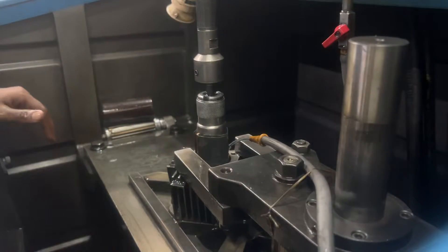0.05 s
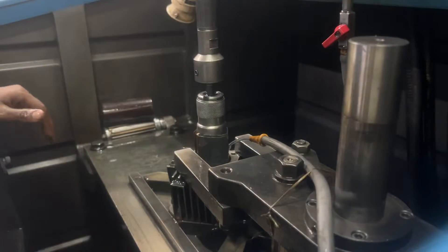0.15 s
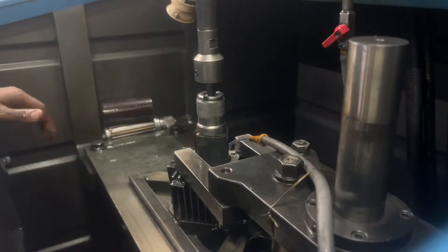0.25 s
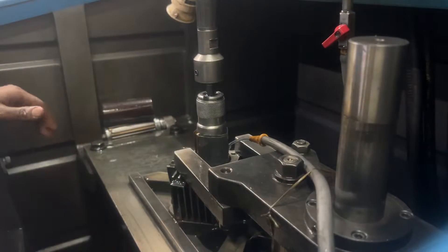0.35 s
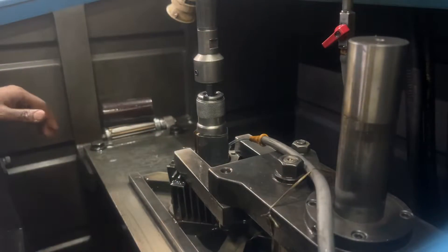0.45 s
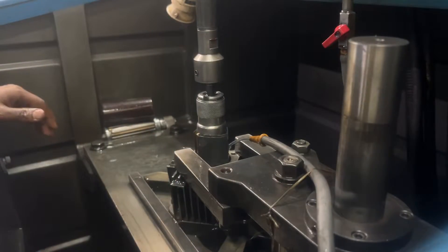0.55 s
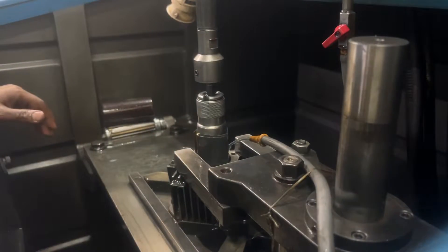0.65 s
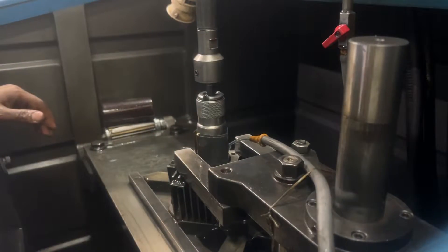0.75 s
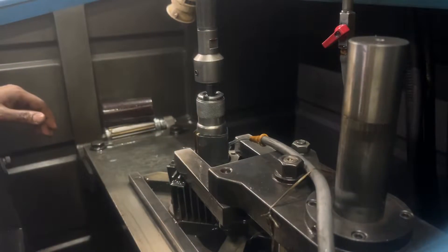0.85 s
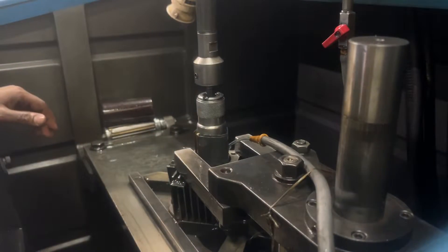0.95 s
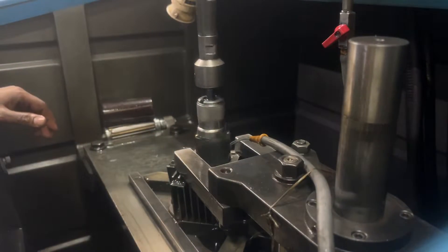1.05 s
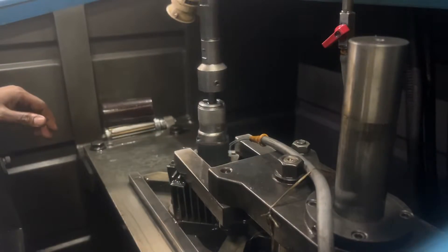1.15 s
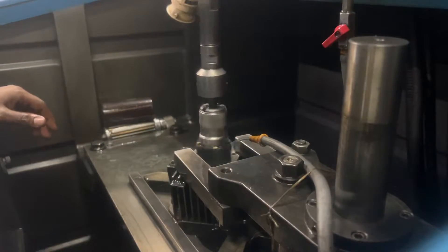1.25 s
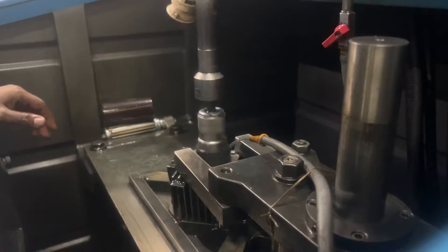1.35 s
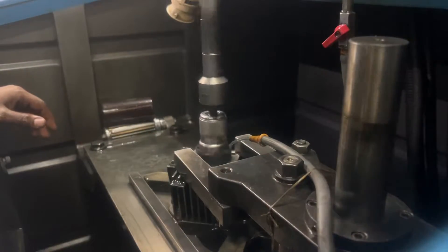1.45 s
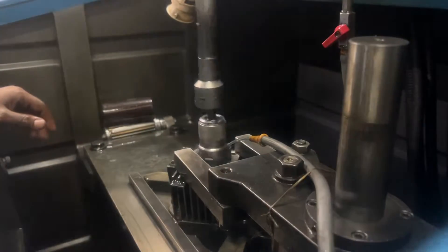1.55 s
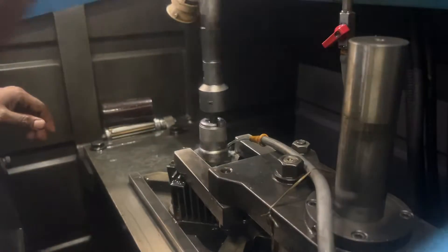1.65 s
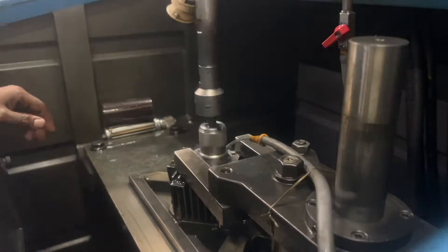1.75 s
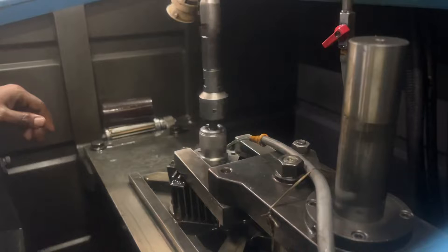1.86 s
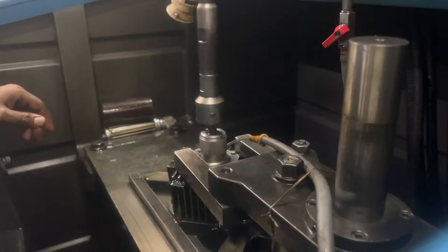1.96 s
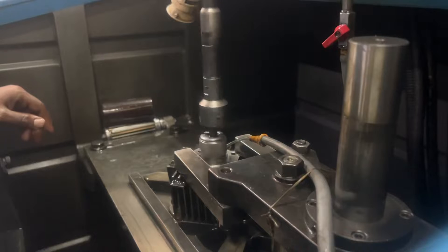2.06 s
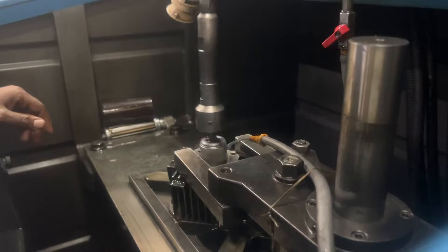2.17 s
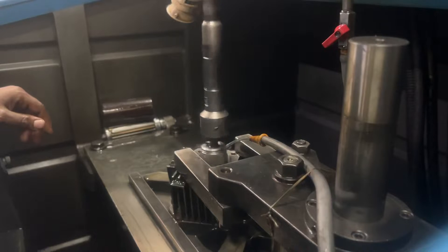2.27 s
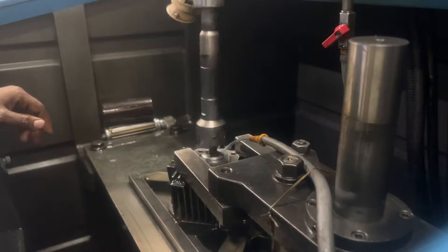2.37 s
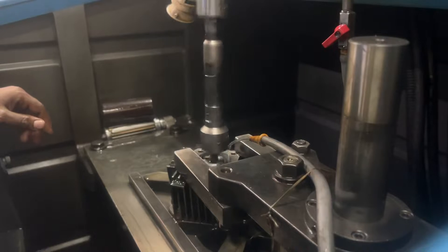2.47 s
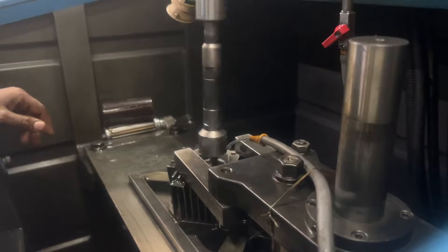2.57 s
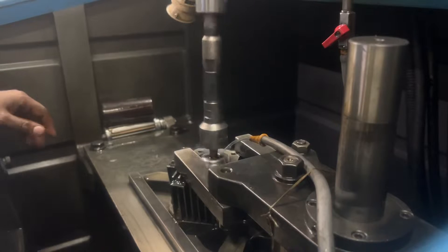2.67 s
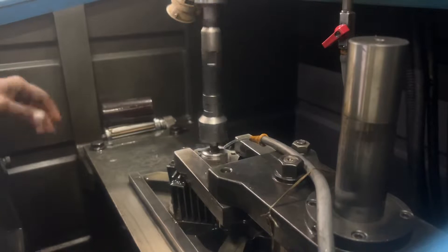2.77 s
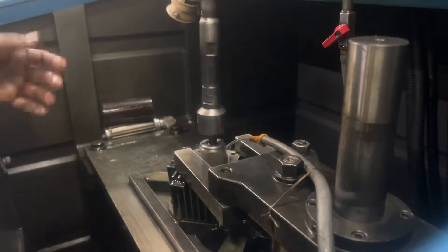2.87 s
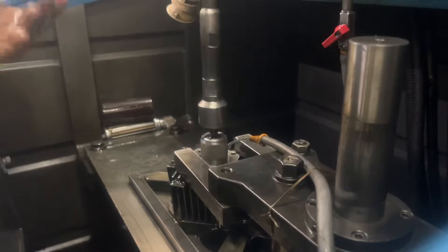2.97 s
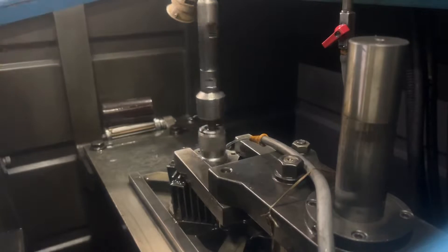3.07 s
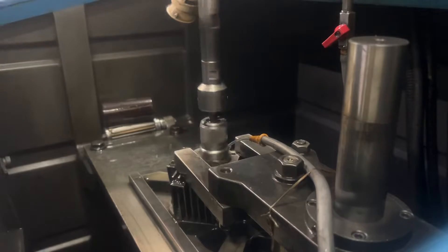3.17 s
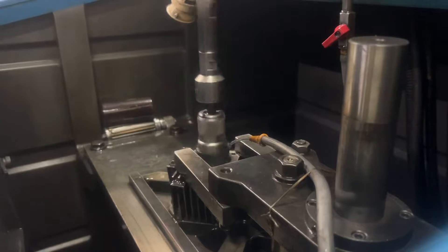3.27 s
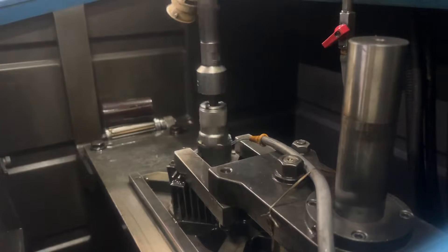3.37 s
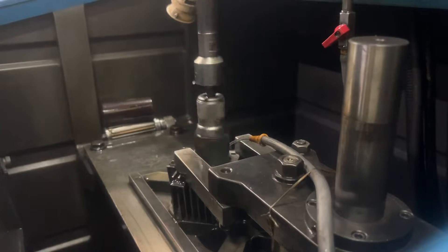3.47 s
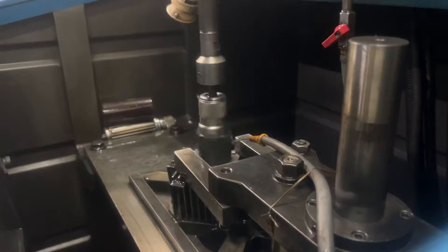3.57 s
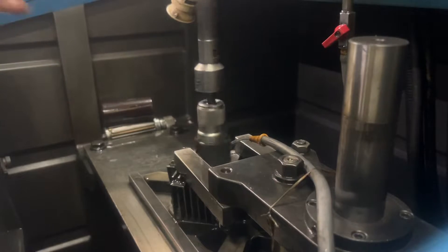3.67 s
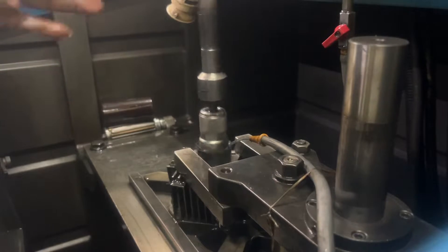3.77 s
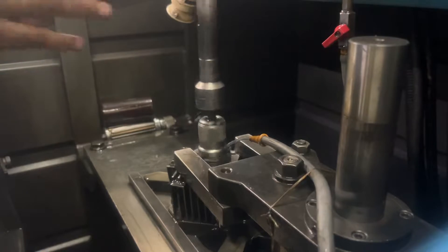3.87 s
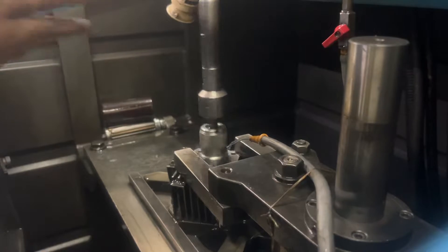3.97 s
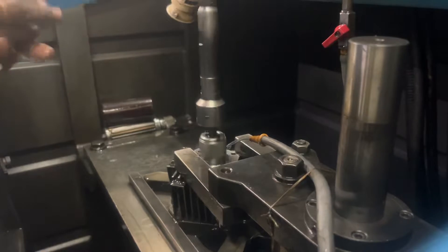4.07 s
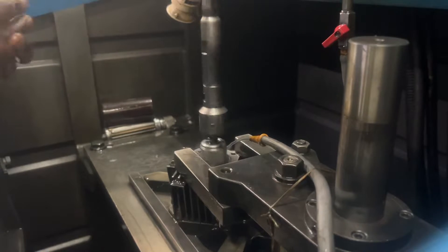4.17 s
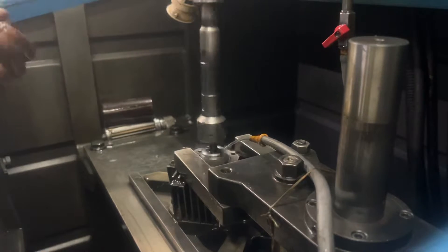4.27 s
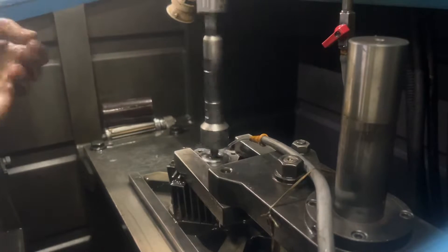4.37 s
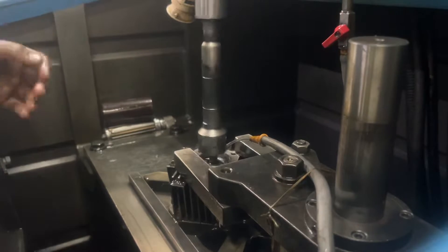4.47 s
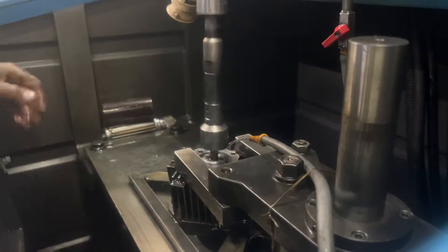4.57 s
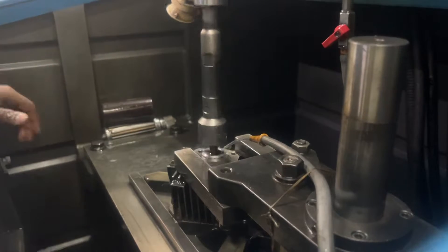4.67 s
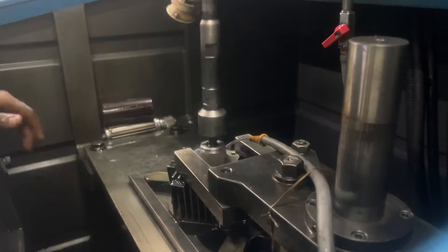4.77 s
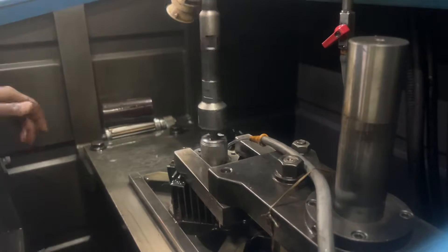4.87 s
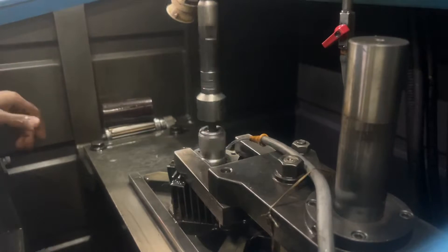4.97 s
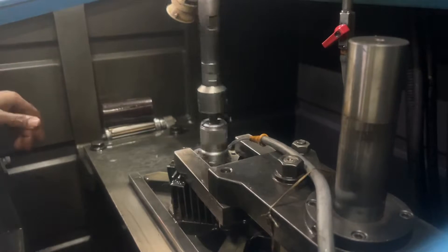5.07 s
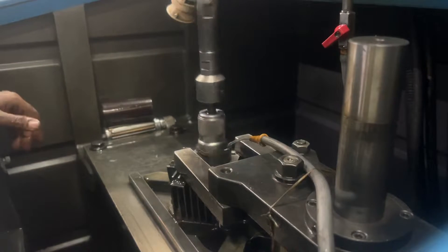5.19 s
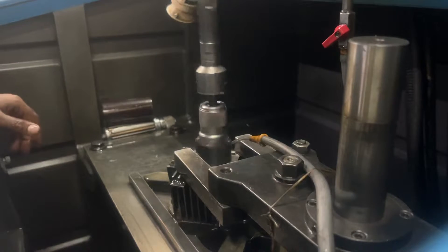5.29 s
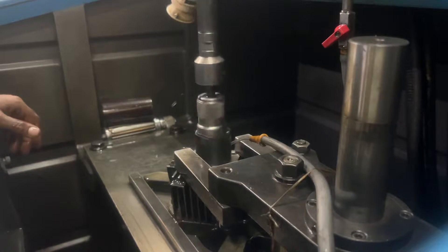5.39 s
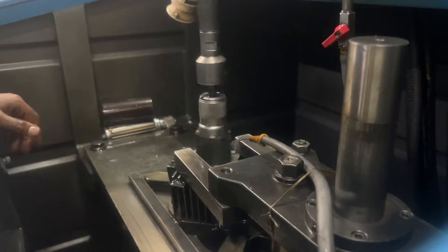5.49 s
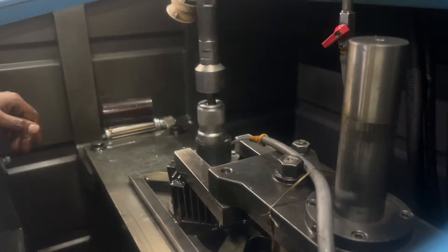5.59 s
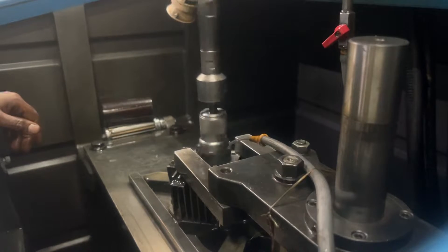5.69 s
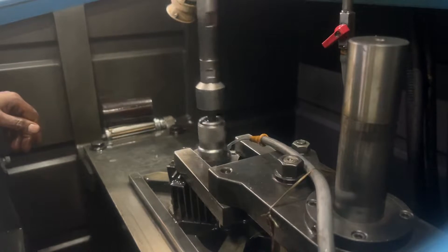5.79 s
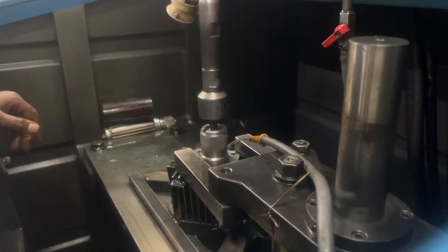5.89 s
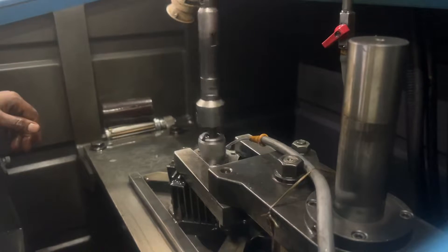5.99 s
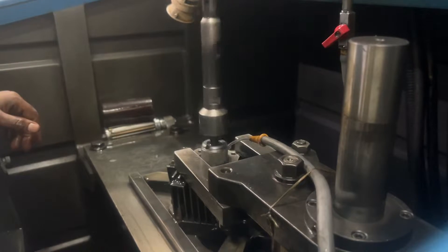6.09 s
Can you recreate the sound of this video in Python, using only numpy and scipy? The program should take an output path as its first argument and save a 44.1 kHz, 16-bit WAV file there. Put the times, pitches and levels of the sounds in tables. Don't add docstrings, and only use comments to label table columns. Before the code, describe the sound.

Close inside a steel test-bench cabinet, a hydraulic pump holds a strong hum near 290 hertz with faint motor whine. Just before one second a valve clacks and the ram starts, adding oil hiss, rumble and thin seal squeaks. At about 2.5, 3.5, 4.5 and 5.4 seconds, stroke ends bring metallic clatter, a spit of oil at some, and low wall booms. Close stereo phone pickup, short dense metal echo.

```python
import sys
import numpy as np
from scipy import signal
from scipy.fft import rfft, irfft
from scipy.io import wavfile
from scipy.ndimage import uniform_filter1d

SR = 44100
rng = np.random.default_rng(int(sys.argv[2]) if len(sys.argv) > 2 else 0)


def invert_db(x):
    u = np.asarray(x, float) / 20
    return 10 ** u


def materialize(psi):
    bounded = np.clip(np.atleast_2d(psi).T, -1, 1)
    quanta = np.round(bounded * 32767).astype(np.int16)
    wavfile.write(sys.argv[1], SR, quanta)


N = 270774
T = np.arange(N) / SR
HZ = np.arange(N // 2 + 1) * SR / N + 1e-3

# (time [s], level [dB])
PUMP_HUM = [(0, -21.5), (.2, -19), (.9, -19.4), (1.22, -18.6), (1.9, -19.7), (2.45, -19.8), (2.72, -18.9),
            (3.0, -19.9), (3.4, -20), (3.7, -21), (4.8, -19.5), (5.35, -20.5), (5.61, -19), (5.85, -20.5),
            (6.14, -20.5)]
# (multiple of the hum, idle [dB], loaded [dB], left minus right [dB], left lead [rad])
OVERTONES = [(2, -42, -51, 5.5, 1.13), (3, -45, -44.5, -0.5, 1.85), (5, -61, -57, 2, -1.5),
             (7, -63, -57.5, -8, 2), (8, -52, -56, 3, 2), (9, -55, -59.5, 5, 1.64),
             (12, -66, -65, -13, -0.2), (13, -58.5, -67, 6, -5.1), (14, -60, -60, 0, 1.2)]
WHINE_HZ = (246.5, 301.5, 315, 537.4, 690, 3227, 6690, 7219, 8226, 8440, 8694, 8992, 9285)
# (idle [dB], loaded [dB], left minus right [dB], left lead [rad])
WHINES = [(-36.5, -37.5, 5, -0.28), (-53, -41, -5, -1), (-38.5, -40.5, -1, -0.9), (-44.5, -51, -1, 0.2),
          (-72, -49, 3, 2), (-56.5, -56, 3.5, 1.36), (-68, -84, 9, .3), (-69, -74, 5, 4.5),
          (-74, -62.5, 0.3, 1), (-75, -62, -1, 0.8), (-72, -83, -5, -.3), (-57.5, -62.5, 1, -1.5),
          (-67, -66, 6, -1)]
# (time [s], depth [share of the hum], bounce [Hz])
JOLTS = [
    (.9, .3, 28),
    (2.541, 1.2, 26.5),
    (2.667, .8, 27),
    (3.53, .4, 28),
    (4.481, 1.1, 31),
    (4.585, .5, 30),
    (5.47, .3, 28),
]

SHIFTS = [
    (0.87, -31.5, -2.5),
    (.945, -43, 5),
    (2.522, -36, 4),
    (3.504, -33, -1),
    (4.454, -33.5, 5),
    (5.424, -34, -3),
]
SEATS = [
    (2.607, -30.5, 0),
    (4.553, -32.5, 0),
    (4.67, -37, 0),
    (5.52, -41.5, 0.00092),
]
SPURTS = [
    (2.619, -38.5, 0),
    (4.556, -36.5, 0),
    (5.775, -47, 0),
]
TICKS = [(.002, -45.5, 8), (.845, -47, 6), (1.69, -45, 4), (1.966, -47, 10), (2.503, -44, 13),
         (3.485, -48, 8), (4.045, -44, 0), (4.435, -46, 5), (5.405, -45, 5), (5.95, -46, 8), (5.99, -51, 6)]
# (frequency [Hz], width [Hz], level [dB])
CLANK = [(314, 87, 6), (575, 90, -6), (980, 400, -4), (1444, 250, -5), (1705, 200, -4), (2030, 250, -2),
         (1600, 1500, -4)]
CLINK = [(2280, 58, 5.5), (2820, 92, -7), (3386, 190, -1), (4000, 400, -26), (2780, 1860, -5.5),
         (11000, 1600, -6.5), (13000, 2500, -11)]
CHATTER = [(4400, 980, 2.5), (5470, 500, 2), (6070, 740, 5.5), (5400, 4700, 1)]
SPIT = [(7700, 1000, -1), (8810, 790, 3.5), (10800, 1500, -17)]
# (time [s], frequency [Hz], level [dB])
BRIEF_PINGS = [(.885, 2900, -44), (.89, 1800, -42), (.901, 2250, -41), (.93, 1800, -44), (.977, 2250, -44),
               (2.538, 3056, -44), (2.539, 2693, -44), (2.54, 992, -36), (2.54, 1953, -39),
               (2.613, 1000, -35), (2.627, 1055, -37), (2.628, 2016, -43), (2.631, 1496, -40),
               (2.654, 1591, -42), (2.655, 583, -32), (2.677, 1008, -38), (3.521, 835, -36),
               (3.537, 2599, -44), (3.541, 1591, -43), (3.543, 1213, -42), (3.574, 1606, -45),
               (4.472, 788, -34), (4.477, 1496, -36), (4.476, 450, -24), (5.435, 520, -31),
               (4.481, 1969, -33), (4.483, 2583, -43), (4.485, 3260, -43), (4.524, 1402, -40),
               (4.569, 1480, -38), (4.586, 945, -35), (4.629, 1591, -43), (4.684, 1606, -45),
               (4.737, 1559, -47), (5.421, 1449, -44), (5.45, 2788, -47), (5.498, 1528, -44),
               (5.552, 600, -31), (5.585, 500, -30)]
LONG_PINGS = [(.888, 3500, -41), (.918, 1820, -43), (.92, 2300, -43), (.96, 3200, -43), (2.547, 1717, -38),
              (2.546, 1292, -41), (2.551, 2315, -40), (2.545, 3276, -43), (2.55, 583, -29),
              (3.52, 3481, -42), (3.524, 1937, -39), (4.477, 3024, -44), (5.445, 2063, -41),
              (5.445, 3300, -45), (5.465, 2200, -41), (5.465, 3250, -46), (5.455, 1528, -45)]

# (start [s], end [s], start pitch [Hz], end pitch [Hz], level [dB])
THIN_SQUEAKS = [(-.1, .25, 2550, 2550, -48.5), (.22, .83, 2555, 2580, -54), (0.233, .6, 2250, 2275, -46.5),
                (1.0, 1.2, 2620, 2620, -52), (1.023, 1.326, 8000, 8030, -48.5),
                (1.27, 1.41, 2830, 2820, -52), (1.42, 1.6, 3220, 3245, -47), (1.5, 1.748, 2110, 2150, -49),
                (2.1, 2.52, 2620, 2620, -53), (2.25, 2.4, 2400, 2420, -47), (2.62, 3.0, 2570, 2600, -52),
                (2.85, 3.1, 2040, 2040, -53), (3.1, 3.5, 2560, 2590, -52), (3.6, 4.0, 2070, 2080, -50.5),
                (3.98, 4.26, 1987, 2110, -47), (4.294, 4.46, 2100, 2150, -47.5)]
ROUGH_SQUEAKS = [
    (.22, .58, 3430, 3380, -49),
    (2.64, 3.06, 3400, 3430, -52),
    (3.04, 3.49, 3500, 3645, -51.5),
    (3.1, 3.25, 3310, 3300, -52),
    (5.684, 5.899, 3380, 3450, -47),
]
SCRAPES = [
    (1.054, 1.397, 4480, 4330, -47),
]
SQUEAK_WIDTHS_HZ = (45, 64, 600)

# (time [s], boom pitch [Hz],
# boom [dB], rattle [dB])
LURCHES = [(.9, 65.5, -40.5, -35), (1.035, 67.2, -28, -29.5), (1.11, 66.3, -29, -31.5),
           (1.19, 65.3, -30.5, -32.5), (1.31, 64.84, -32.5, -48), (1.61, 63.5, -42, -37),
           (2.55, 72.6, -35.5, -26.5), (2.595, 72.3, -27.5, -27), (2.7, 71.7, -15.5, -26.5),
           (2.83, 68, -21.5, -31.5), (2.9, 66.8, -26, -31), (3.0, 67.3, -31, -37), (3.27, 68.4, -37, -35.5),
           (3.53, 73.2, -41, -27.5), (3.59, 72.3, -22, -28), (3.75, 71, -24.5, -34), (3.91, 67.7, -34, -39),
           (4.49, 59, -39, -25), (4.56, 65, -24.5, -26.5), (4.645, 65.8, -15, -27.5),
           (4.77, 64.9, -22.5, -29), (4.83, 65.4, -26, -34), (4.99, 65.4, -32.5, -36.5),
           (5.49, 67.7, -23.5, -30), (5.57, 71.3, -34, -29.5), (5.67, 69, -27.5, -38),
           (5.81, 67.6, -36, -39), (5.92, 68.5, -36, -41)]
# (frequency [Hz], level per Hz [dB])
RATTLE = [(90, -9.5), (200, 3), (330, 4.5), (600, -6.5), (1200, -21.5), (2200, -26)]
# (time [s], level [dB], fall [dB per s])
SWAYS = [
    (1.14, -29, 42),
    (2.58, -31, 30),
    (3.58, -34, 150),
    (4.52, -27, 42),
    (5.49, -33, 130),
]
DOOR_HZ = (157.9, 128.6)
# (time [s], level [dB])
UPPER_SURGES = [(.2, -32), (.52, -31.5), (.92, -28), (1.05, -32), (1.32, -30), (1.55, -27.5), (1.68, -25.5),
                (1.77, -28), (1.95, -30), (2.2, -30), (2.32, -32), (2.62, -30), (2.75, -30), (2.86, -27),
                (3.07, -24.5), (3.27, -31), (3.52, -28.5), (3.69, -23.5), (3.82, -32), (4.2, -26.5),
                (4.38, -29.5), (4.62, -31), (4.75, -30), (4.88, -29), (5.0, -31), (5.24, -30.5),
                (5.49, -29), (5.68, -28.5), (6.0, -29), (6.1, -33.5)]
LOWER_SURGES = [(.01, -45), (.92, -52), (1.6, -32), (2.1, -33.5), (2.5, -29.5), (2.85, -31), (3.15, -34.5),
                (3.65, -38), (3.9, -31), (4.45, -32.5), (4.7, -40), (5.45, -35), (5.85, -33), (6.1, -33.5)]
# (time [s], level [dB])
THUDS = [
    (1.01, -32),
    (1.11, -33),
    (2.65, -36),
    (2.76, -28),
    (4.59, -34),
    (4.66, -31),
    (4.75, -36),
]

# (time [s], hiss level [dB], tilt towards the treble [dB])
FLOW = [(0.0, -68, 8), (0.84, -55.5, 9), (0.94, -62, 0), (1.09, -44.5, 1.5), (1.26, -45, 2.5),
        (1.88, -48, 5), (2.51, -46.5, 0), (2.62, -48.5, 3.5), (3.3, -48.5, 3.5), (3.64, -47, 1),
        (4.43, -47.5, 2), (4.62, -50.5, 3), (5.27, -50.5, 2.5), (5.64, -48.5, -1), (5.93, -48, 1.5),
        (6.14, -47, -0.5)]
# (frequency [Hz], level per Hz [dB])
HISS = [(1200, 2), (2500, -6.5), (4500, -2), (6800, -9), (9000, -5), (11500, -6), (13000, -21),
        (15700, -12)]
RUMBLE = [(30, -16), (55, 0), (100, -2), (200, 3), (350, -2.5), (700, -10), (1400, -26.5), (2500, -26.5)]
FLOOR = [(30, 1.5), (100, -11), (200, -1.5), (400, -7.5), (750, -13.5), (1000, -16), (1800, -24.5),
         (3300, -21), (5500, -35), (8500, -26), (12000, -31.5), (15700, -35.5)]
# (frequency [Hz], width [Hz], idle [dB], loaded [dB])
PANELS = [(95, 94, -63, -45), (196, 100, -40.5, -40.5), (264, 26, -45, -41), (390, 16, -60, -49),
          (491.7, 35, -54, -46.5), (687, 21, -61, -57), (1160, 96, -57, -59)]

# (frequency [Hz], likeness [0-1], left minus right [dB], right lead [rad])
PORTS = [(60, 0.92, 1.5, -0.38), (307, 1, -0.5, 0.0066), (645, 0.65, -2, -0.92), (1270, 0, 3, 1.7),
         (2400, 0.46, 0.5, -1.5), (3520, 0.42, 6, -0.38), (5100, 0.52, 9.5, -0.7), (7100, 0, 5.5, -1),
         (7660, 0.8, 2.5, -0.39)]
TREBLE_PORTS = [(8550, .9, 0, 0), (9700, .95, 0, 2.75), (10750, .95, 0, 3.45), (11750, .9, 0, 5.9),
                (12650, .9, 0, 6.7), (13300, .9, 0, 9.0), (14400, .9, 0, 9.9), (15400, .88, 0, 12.5)]


def pump():
    s, db = np.transpose(PUMP_HUM)
    piston_hz = 291.0 + 0.2996 * walk(3)
    turns = np.cumsum(piston_hz) / SR
    hum_gain = jolts() * invert_db(np.interp(T, s, db) + 0.76 * walk(4.94))
    out = hum_gain * tone(turns, pan_db=-0.15, lead=0.06)
    for k, idle_db, load_db, pan_db, lead in OVERTONES:
        out = out + loaded(idle_db, load_db) * waver() * tone(round(k) * turns, pan_db, lead)
    for hz, (idle_db, load_db, pan_db, lead) in zip(WHINE_HZ, WHINES):
        drift = np.cumsum(1 + 0.0005 * walk(3)) / SR
        out = out + loaded(idle_db, load_db) * waver() * tone(hz * drift, pan_db, lead)
    return out


def jolts():
    rise_s, fade_s = 0.012, 0.04
    gain = np.ones(N)
    for at, depth, bounce_hz in JOLTS:
        age = T - at
        size = np.where(age < 0, np.exp(-(age / rise_s) ** 2), np.exp(-np.abs(age) / fade_s))
        gain += depth * size * np.cos(2 * np.pi * bounce_hz * age)
    return gain


def waver():
    swell_db, flutter_db = 0.9, 2.2
    return invert_db(swell_db * walk(4.06) + flutter_db * walk(21.96))


def valves():
    clank, clink, chatter, spit = [struck_steel(modes) for modes in (CLANK, CLINK, CHATTER, SPIT)]
    flurry_s = 0.012
    # (rise [s], time to die by 60 dB [s], clank [dB], clink [dB], chatter [dB], spit [dB], moments)
    kinds = [(0.022, 0.29, -2, -4.5, -10, -12.5, SHIFTS),
             (0.016, 0.36, -2.5, -28, -25, -32, SEATS),
             (0.009, 0.24, -26, -26, -20, 1, SPURTS),
             (0.012, 0.31, -9, -7, -1, -10, TICKS)]
    out = 0
    for rise, t60, clank_db, clink_db, chatter_db, spit_db, moments in kinds:
        bright = invert_db(clink_db) * clink + invert_db(chatter_db) * chatter + invert_db(spit_db) * spit
        for s, db, tilt_db in moments:
            age = np.maximum(T - s, 0)
            swell = np.sin(np.pi / 2 * np.clip(age / rise, 0, 1)) ** 2
            decay = invert_db(db - 60 * np.maximum(age - rise - flurry_s, 0) / t60)
            out = out + swell * decay * (invert_db(clank_db + tilt_db) * clank + bright)
    return out


def struck_steel(modes):
    power = sum((invert_db(db) * ring(hz, width)) ** 2 for hz, width, db in modes)
    return noise(np.sqrt(power)) * invert_db(1.6 * walk(200))


def pings():
    lead_in_s = 0.03
    side_db, side_rad = np.array([[2.1], [-2.5]]), np.array([[0.4], [-0.4]])
    out = np.zeros((2, N))
    for rows, rise_s, t60_s in ((BRIEF_PINGS, 0.005, 0.07), (LONG_PINGS, 0.007, 0.14)):
        age = T[:SR // 5] - lead_in_s
        shape = np.where(age < 0, np.exp(-(age / rise_s) ** 2), invert_db(-60 * age / t60_s))
        for s, hz, db in rows:
            at = int((s - lead_in_s) * SR)
            note = np.sqrt(2) * np.sin(2 * np.pi * hz * age + side_rad)
            out[:, at:at + len(age)] += invert_db(db + side_db) * shape * note
    return out


def seals():
    quarter_turn = np.array([[0], [0.25]])
    out = 0
    for width, rows in zip(SQUEAK_WIDTHS_HZ, (THIN_SQUEAKS, ROUGH_SQUEAKS, SCRAPES)):
        rough = np.clip(width / 190, 0, 1)
        smear = np.sqrt(1 - rough ** 2) + rough * noise(1 / (1 + (HZ / width) ** 2))
        for t0, t1, hz0, hz1, db in rows:
            along = np.clip((T - t0) / (t1 - t0), 0, 1)
            pitch = hz0 + (hz1 - hz0) * along + 0.32 * width * walk(60)
            turns = np.cumsum(pitch) / SR
            squeak = np.sqrt(2) * np.sin(2 * np.pi * (turns + quarter_turn))
            out = out + invert_db(db) * np.sin(np.pi * along) ** 0.26 * smear * squeak
    return out


def cabinet():
    s, hz, boom_db, rattle_db = np.transpose(LURCHES)
    boom_gain = surges(s, boom_db, 330, 212, loaded(-66.5, -46.5))
    rattle_gain = surges(s, rattle_db, 397, 86, loaded(-62, -42))
    boom_turns = np.cumsum(np.interp(T, s, hz) + 2.73 * walk(14)) / SR
    boom = boom_gain * tone(boom_turns, pan_db=2.5, lead=0.1)
    at, sway_db, fall_db_s = np.transpose(SWAYS)
    sway_gain = surges(at, sway_db, 230, fall_db_s, loaded(-70, -53))
    sway_turns = np.cumsum(48.5 + 2.05 * walk(5)) / SR
    sway = sway_gain * tone(sway_turns, pan_db=3.0, lead=0.1)
    rattle = rattle_gain * invert_db(3.5 + 0.54 * walk(30)) * noise(slope(RATTLE))
    return boom + sway, rattle


def doors():
    # (moments, rise [dB per s], fall [dB per s], idle [dB], rest under load [dB])
    upper = (UPPER_SURGES, 130, 113, -40, -37.5)
    lower = (LOWER_SURGES, 33, 38, -58, -43)
    out = 0
    for hz, (rows, rise, fall, idle_db, rest_db) in zip(DOOR_HZ, (upper, lower)):
        size = surges(*np.transpose(rows), rise, fall, loaded(idle_db, rest_db))
        size = size * invert_db(-1.0 + 2.0 * walk(28))
        turns = np.cumsum(hz + 6.88 * walk(45)) / SR
        out = out + size * tone(turns, pan_db=1.5, lead=0.25)
    return out


def low_rattle():
    turns = np.cumsum(100.3 + 5.0 * walk(20)) / SR
    return surges(*np.transpose(THUDS), 300, 250, 0) * tone(turns, pan_db=1.8, lead=0.1)


def oil_hiss():
    s, hiss_db, tilt_db = np.transpose(FLOW)
    treble = np.clip((HZ - 6500) / 1500, 0, 1)
    hiss = rfft(breathing(HISS, swell_db=0.2, flicker_db=0.7))
    dull = irfft(hiss * (1 - treble), N)
    bright = irfft(hiss * treble, N) * invert_db(np.interp(T, s, tilt_db))
    return invert_db(np.interp(T, s, hiss_db) + 3.0) * (dull + bright)


def background():
    out = invert_db(-37) * breathing(FLOOR, swell_db=2.1, flicker_db=1.14)
    out = out + loaded(-46, -33) * breathing(RUMBLE, swell_db=1.5, flicker_db=1.5)
    for hz, width, idle_db, load_db in PANELS:
        out = out + loaded(idle_db, load_db) * noise(ring(hz, width))
    return out


def walls(pair):
    t60_s, echo_db = 0.3, -7
    echo = rng.standard_normal(N // 20) * invert_db(-60 * T[:N // 20] / t60_s)
    echo = echo * invert_db(echo_db) / np.linalg.norm(echo)
    return irfft(rfft(pair) * (1 + rfft(echo, N)), N) / np.sqrt(1 + invert_db(2 * echo_db))


def ports(pair):
    hz, *columns = np.transpose([*PORTS, *TREBLE_PORTS])
    like, pan_db, lead = (np.interp(np.log(HZ), np.log(hz), c) for c in columns)
    left, other = rfft(pair)
    right = like * left * np.exp(1j * lead) + np.sqrt(1 - like ** 2) * other
    turn = 0.5 * walk(18)
    high = right * np.clip((HZ - 9000) / 4500, 0, 1)
    shift = irfft(high, N) * (np.cos(turn) - 1) + irfft(1j * high, N) * np.sin(turn)
    right = right + rfft(shift)
    return irfft(np.array([left * invert_db(pan_db / 2), right * invert_db(-pan_db / 2)]), N)


def unit(x):
    return x / np.sqrt(np.mean(x ** 2))


def noise(gain):
    return unit(irfft(rfft(rng.standard_normal((2, N))) * gain, N))


def slope(points):
    hz, db = np.transpose(points)
    return invert_db(np.interp(np.log(HZ), np.log(hz), db, left=-70, right=-70))


def ring(hz, width):
    return 1 / (1 + ((HZ ** 2 - hz ** 2) / (HZ * width)) ** 2)


def walk(rate):
    k = int(SR / rate)
    steps = np.repeat(rng.standard_normal(N // k + 1), k)
    return unit(uniform_filter1d(uniform_filter1d(steps, k), k)[:N])


def loaded(idle_db, loaded_db):
    load_s = 0.876
    return invert_db(np.interp(T, [load_s - 0.03, load_s + 0.039], [idle_db, loaded_db]))


def tone(turns, pan_db, lead):
    side = np.array([[0.5], [-0.5]])
    phase = 2 * np.pi * (turns + rng.random()) + lead * side
    return np.sqrt(2) * invert_db(pan_db * side) * np.sin(phase)


def surges(s, peak_db, rise_db_s, fall_db_s, rest):
    hold_s = 0.02
    for at, db, fall in np.broadcast(s, peak_db, fall_db_s):
        away = np.maximum(np.abs(T - at) - hold_s, 0)
        rest = np.maximum(rest, invert_db(db - np.where(T < at, rise_db_s, fall) * away))
    return rest


def breathing(points, swell_db, flicker_db):
    gain, swell, out = slope(points), walk(1.483), 0
    for hz in 31.25 * 2 ** np.arange(10):
        part = gain * np.cos(np.pi / 2 * np.clip(np.log2(HZ / hz), -1, 1))
        if part.max() > 1e-3:
            level = np.linalg.norm(part) * invert_db(swell_db * swell + flicker_db * walk(12))
            out = out + noise(part) * level
    return unit(out)


def scene():
    boom, rattle = cabinet()
    enclosed = walls(background() + oil_hiss() + rattle)
    noises = ports(enclosed + valves() + seals())
    return pump() + pings() + boom + doors() + low_rattle() + noises


def low_pass(x):
    return signal.sosfilt(signal.butter(12, 17090, fs=SR, output="sos"), x)


def record(dry):
    low_hz, top_hz = 42, 15750
    band = (HZ < top_hz) / np.sqrt(1 + (low_hz / HZ) ** 8)
    mix = irfft(rfft(dry) * band, N)
    return low_pass(mix)


dry = scene()
out = record(dry)
materialize(out)
```